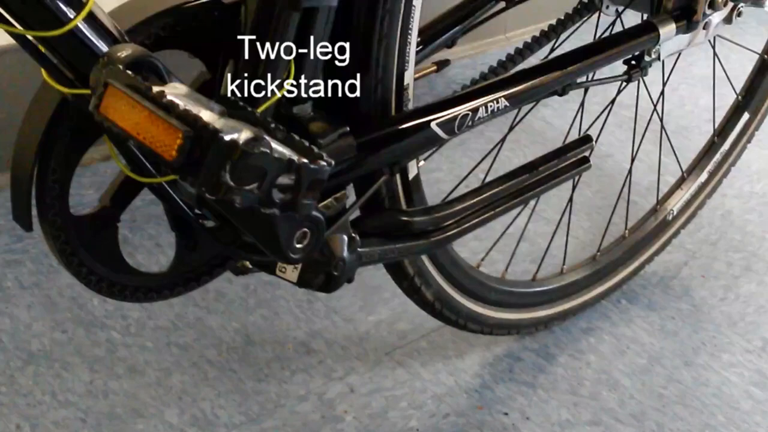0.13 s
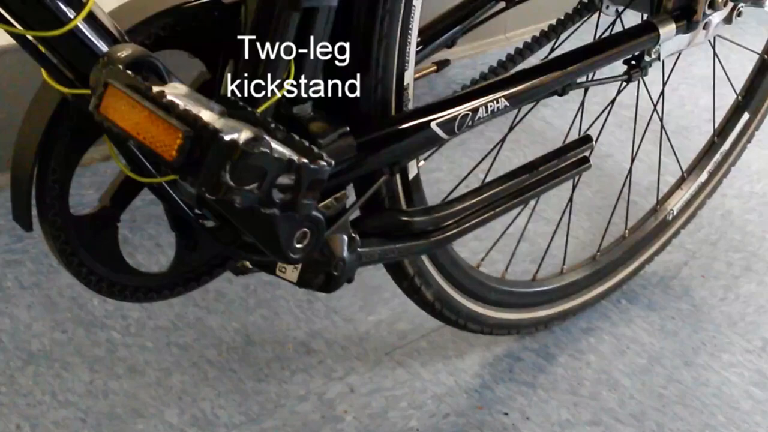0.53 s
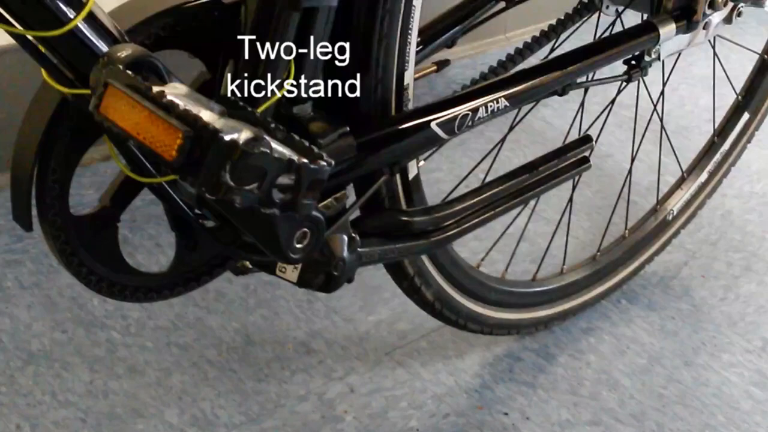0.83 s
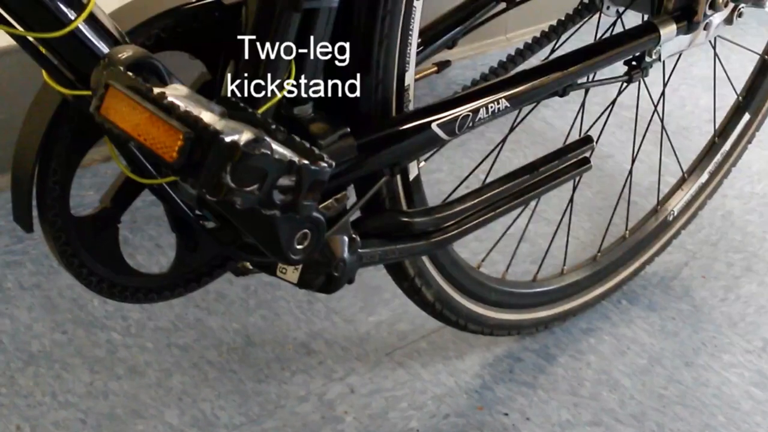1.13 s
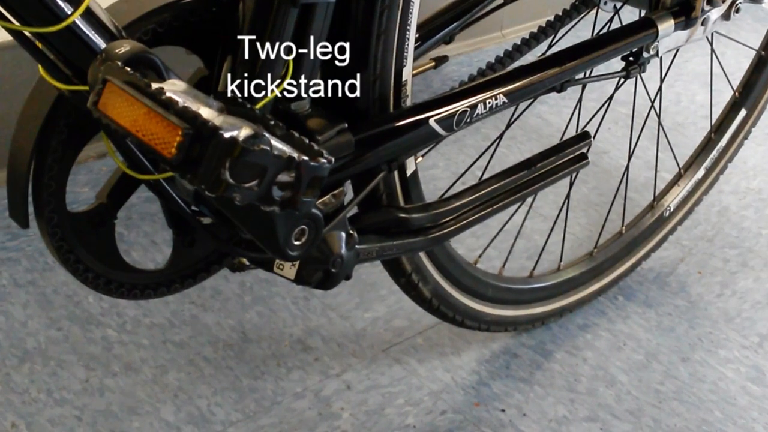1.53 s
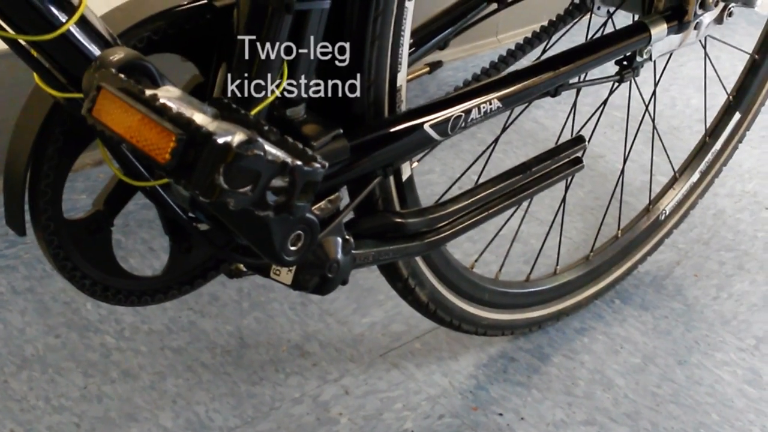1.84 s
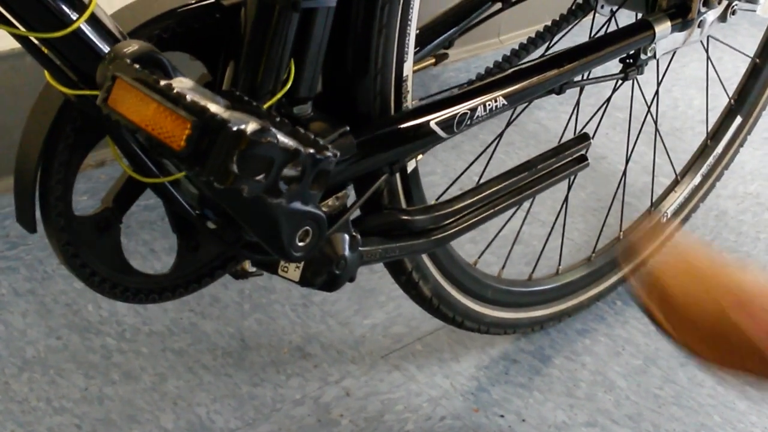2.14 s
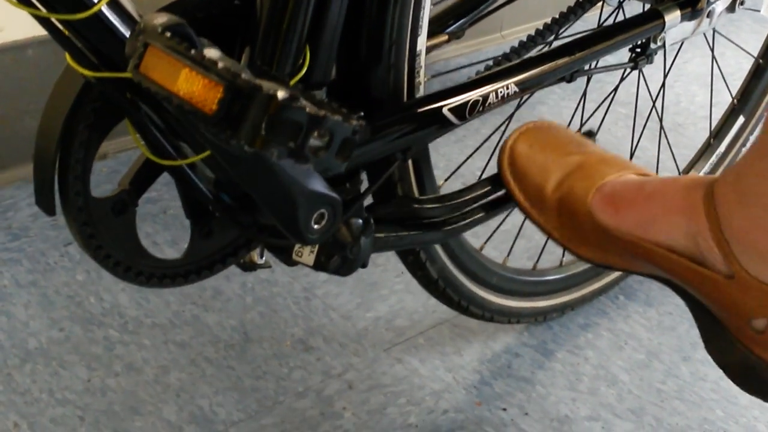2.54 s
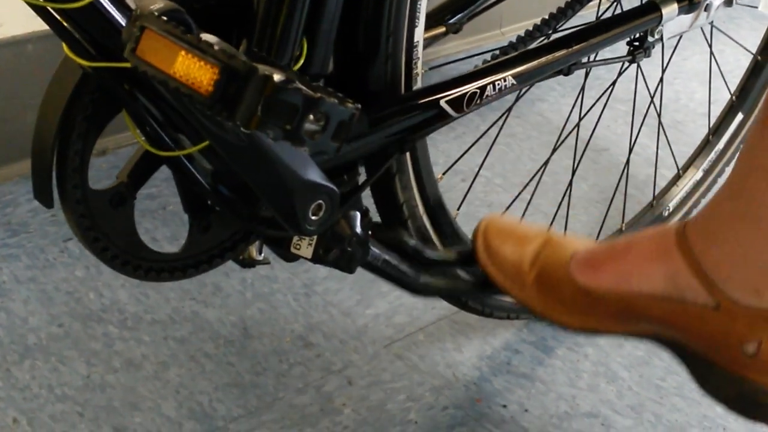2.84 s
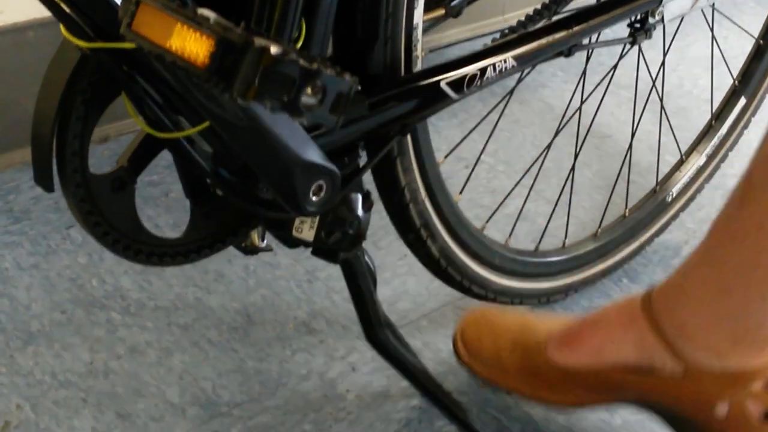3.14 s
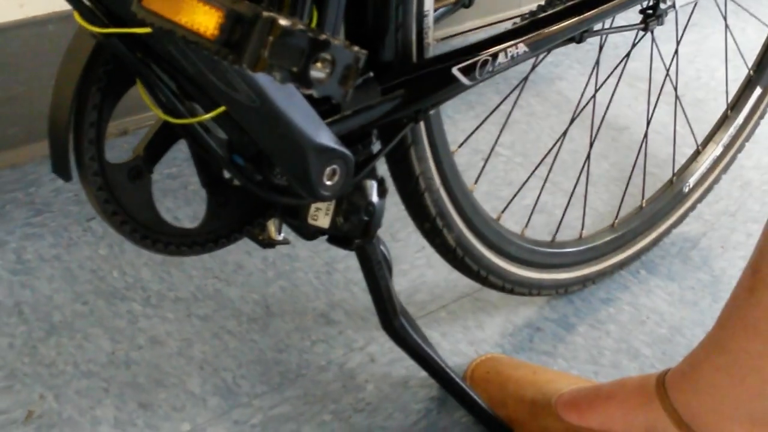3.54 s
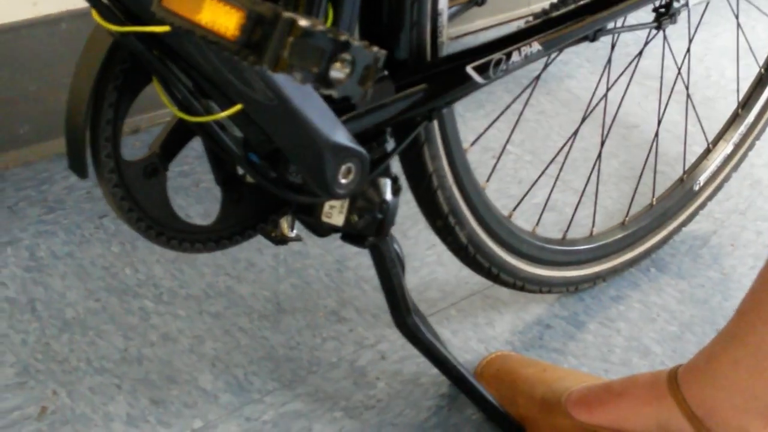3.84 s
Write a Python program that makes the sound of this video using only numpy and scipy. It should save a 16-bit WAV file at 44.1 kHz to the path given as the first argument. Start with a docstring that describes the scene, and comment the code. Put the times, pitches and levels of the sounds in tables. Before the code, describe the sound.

A metal bicycle kickstand is pushed down indoors. Until 3 s there is only low ventilation rumble, wavering hum, soft hiss, faint rustling and tiny ticks, then slight shoe scuffs. At 3.09 s a weak tick leads into two loud, bright steel slaps at 3.11 and 3.13 s, with a half-second room tail. A faint tick at 3.4 s and soft scuff near 3.6 s follow, background lowered.

```python
"""Bicycle stand clacking down on a hard floor

Indoors, a shoe pushes a steel two-leg stand down: one leg ticks, then both slap the floor and the room rings.
The steel is a set of dying sine waves with a noise chatter and a low thud; the room is a dying noise tail.
Shaped noise makes the ventilation rumble, hum, hiss and rustle behind; the opening stretch plays twice.
A phone's gain control drops at the clack and stays low.
"""
import sys
import numpy as np
from scipy import signal
from scipy.fft import rfft, irfft, next_fast_len
from scipy.io import wavfile
from scipy.ndimage import uniform_filter1d, map_coordinates

SR = 44100
rng = np.random.default_rng(int(sys.argv[2]) if len(sys.argv) > 2 else 0)


def wrap_up_sound(samples):
    """Save the sound to the file named by the first command line argument, as 16-bit audio."""
    columns = np.atleast_2d(samples).T
    # keep every value between -1 and 1, then stretch to whole-number steps
    tamed = np.clip(columns, -1, 1)
    steps = np.round(tamed * 32767).astype(np.int16)
    wavfile.write(sys.argv[1], SR, steps)


def decibels_to_gain(level_db):
    """Convert a level in decibels to a linear amplitude gain (20 dB per decade)."""
    exponent = np.asarray(level_db, float) / 20
    return 10 ** exponent


N = 176400  # samples, 4 s

START_S, REPEAT_S = 0.0578, 55915 / 44100  # silence before the sound; length of the stretch heard twice


def unit(x):
    """Scale a sound to an rms of 1."""
    return x / np.sqrt(np.mean(x ** 2) + 1e-20)


def along(points, hz):
    """Read a curve of (Hz, value) points, with straight lines on a log frequency axis."""
    f, v = np.transpose(points)
    return np.interp(np.log(hz + 1), np.log(f + 1), v)


def wobble(rate):
    """A smooth random curve with `rate` random knots a second."""
    return map_coordinates(rng.standard_normal(400), [np.arange(N) * rate / SR])


def filtered(x, response):
    """Make each frequency of x stronger or weaker, as response(hz) says."""
    n = x.shape[-1]
    m = next_fast_len(n + 8192)
    return irfft(rfft(x, m) * response(np.fft.rfftfreq(m, 1 / SR)), m)[..., :n]


def rush(gain, patchy_db):
    """Stereo noise of rms 1, coloured by gain(hz), with louder and softer patches in time and pitch."""
    # how alike left and right are: pitch_hz, likeness (1 = same, 0 = unrelated)
    alike = [(40, 0.52), (110, 0.98), (220, 0.92), (400, .8), (650, 0.72), (1000, 0.021), (2300, -0.071),
             (5700, 0.0036), (14000, 0)]
    z = signal.stft(rng.standard_normal((2, N)), nperseg=512)[2]
    patches = uniform_filter1d(rng.standard_normal(z.shape[1:]), size=6, axis=0)
    patches = unit(uniform_filter1d(patches, size=10, axis=1))
    pair = signal.istft(z * decibels_to_gain(patchy_db * patches), nperseg=512)[1][:, :N]

    def mid_side_gain(hz):
        turn = np.arccos(np.clip(along(alike, hz), -1, 1)) / 2
        return gain(hz) * [np.cos(turn), np.sin(turn)]

    mid, side = filtered(pair, mid_side_gain)
    return unit(np.array([mid + side, mid - side]))


def fade(t, t60):
    """Dying away by 60 dB in t60 seconds."""
    return decibels_to_gain(-60 * t / t60)


def steel_ring(t, tilt_db, length):
    """Legs and frame ring at their own pitches, each dying at its own speed."""
    # ringing pitches of legs and frame: pitch_hz, level_db, t60_s (stretched by `length`)
    steel = [(612, -22, .06), (1985, -21, .35), (2224, -15.5, 0.17), (2975, -11, .025), (3693, -8.5, 0.037),
             (4700, -7, .03), (5300, -10, 0.04), (6650, -3, 0.07), (7400, -12.5, .03), (8000, -4.5, .04),
             (8400, -21, .03), (9400, -10.5, .03), (11100, -13.5, .04)]
    ring = 0
    for hz, db, t60 in steel:
        level_db = db + tilt_db * np.log2(hz / 5000) + rng.normal(0, 1.3, (2, 1))
        phase = rng.uniform(0, 2 * np.pi, (2, 1))
        ring = ring + decibels_to_gain(level_db) * fade(t, t60 * length) * np.sin(2 * np.pi * hz * t + phase)
    return ring


def foot_chatter(t, tilt_db, length):
    """The foot of the leg chatters on the floor: noise that holds for a moment, then fades."""
    # colour of the chatter: pitch_hz, relative level_db per Hz
    chatter_colour = [(180, -51.5), (300, -26.5), (1090, -24.5), (4200, -18.5), (4780, -2.5), (5720, -18),
                      (6730, -9.5), (8460, -10.5), (9180, -16), (14700, -38)]
    hold_s, fade_s, level_db = 0.0035, 0.02 * length, 0.5
    # one part shared by both sides, one of each side's own
    noise = rng.standard_normal(len(t)) + 1.5 * rng.standard_normal((2, len(t)))
    noise = filtered(noise, lambda hz: decibels_to_gain(along(chatter_colour, hz) + tilt_db * np.log2((hz + 1) / 5000)))
    return unit(noise) * decibels_to_gain(level_db) * fade(np.maximum(t - hold_s, 0), fade_s)


def floor_thud(t):
    """The blow on the floor: one low tone that dies quickly."""
    return decibels_to_gain(-21) * fade(t, 0.04) * np.sin(2 * np.pi * 110 * t)


def stand():
    """Each contact chatters, rings and thuds; also returns the bare slaps sent into the room."""
    # contacts of the stand: start_s, level_db (relative), brightness in dB per octave around 5000 Hz,
    # ring length (times the usual)
    blows = [(3.0935, -22, -5, 0.97), (3.1078, 3.5, 0.5, 1.27), (3.1286, 8.5, .5, 0.55),
             (3.4163, -21.5, 8.5, 0.55)]
    rise_s, slap_db = 0.00034, 24
    out, slaps = np.zeros((2, N + SR)), np.zeros(N)
    t = np.arange(SR // 2) / SR
    for start_s, db, tilt_db, length in blows:
        blow = steel_ring(t, tilt_db, length) + foot_chatter(t, tilt_db, length) + floor_thud(t)
        rise = 1 - np.exp(-t / rise_s)
        i = round(start_s * SR)
        out[:, i:i + len(t)] += decibels_to_gain(db - 7) * rise * blow
        slaps[i] = decibels_to_gain(db + slap_db) * length
    return out[:, :N], slaps


def room(x):
    """A weak near answer, then the far walls build the tail; each frequency dies at its own speed."""
    # how long the room rings: pitch_hz, t60_s
    ring_time = [(200, 0.52), (600, .7), (1300, 0.51), (2000, 0.57), (3500, 0.52), (5000, 0.53), (8000, .5),
                 (11000, 0.43), (13000, 0.19)]
    near_db, far_wall_s, build_s = -3, 0.036, 0.013
    hz, t, z = signal.stft(rng.standard_normal((2, SR)), SR, nperseg=256)
    tail = signal.istft(z * fade(t, along(ring_time, hz)[:, None]), SR, nperseg=256)[1]
    u = np.arange(tail.shape[1]) / SR
    far = 1 / (1 + np.exp(-(u - far_wall_s) / build_s * 4))
    tail = tail * (decibels_to_gain(near_db) + far) * np.clip(u / 0.0053, 0, 1)  # fades in over 5.3 ms
    return signal.fftconvolve(x[None], tail / np.linalg.norm(tail[0]), axes=1)[:, :N]


def room_answer(steel, slaps):
    """The coloured slaps and some of the left side's steel sound go round the room."""
    # what the blow sends round the room: pitch_hz, level_db
    room_colour = [(150, -41.5), (280, -9.5), (450, -14), (650, -5), (1000, -17.5), (1500, -12.5),
                   (2050, 2), (2800, -7), (3600, -8), (4800, -6), (5800, -9.5), (6700, -1.5), (8000, -4),
                   (10000, -10.5), (11500, -17.5), (13000, -40.5)]
    sent = filtered(slaps, lambda hz: decibels_to_gain(along(room_colour, hz))) + decibels_to_gain(-9.5) * steel[0]
    return decibels_to_gain(0.5) * room(sent)


def rustle(t):
    """Clothes and shoes: patchy noise that swells and sinks with the movements."""
    # rustle in the repeated stretch: time_s, level_db
    rustle_level = [(0.06, -39), (0.288, -47), (0.526, -42), (0.624, -50), (0.818, -61), (0.848, -40.5),
                    (0.866, -47), (0.904, -37.5), (0.926, -43.5), (1.024, -50), (1.228, -43), (1.32, -46)]
    # shoe on floor: time_s, half_length_s, level_db
    scuffs = [(2.76, 0.048, -53), (3.005, 0.0059, -47.5), (3.074, 0.011, -68), (3.04, 0.039, -43.5),
              (3.566, 0.033, -36), (3.8, 0.063, -47.5)]
    # colour of the rubbing: pitch_hz, relative level_db per Hz
    cloth = [(880, -14.5), (1500, -10.5), (1980, -8.5), (2280, -6.5), (3130, -13.5), (4130, -9),
             (6050, -6.5), (7540, 0), (8140, -5.5), (10400, -5), (13500, -17), (14700, -26.5)]
    level = decibels_to_gain(np.interp(t, *np.transpose(rustle_level))) * (t < START_S + REPEAT_S)
    for middle_s, half_s, db in scuffs:
        level = level + decibels_to_gain(db) * np.exp(-((t - middle_s) / half_s) ** 2)
    return level * decibels_to_gain(0.41 * wobble(40)) * rush(lambda hz: decibels_to_gain(along(cloth, hz)), patchy_db=2)


def faint_ticks(t):
    """Small ticks: sine waves that start at once and die by 60 dB in 14 ms."""
    # faint ticks: start_s, level_db, pitch_hz
    tick_list = [(0.84, -37, 5100), (2.908, -39, 5200), (2.625, -47.5, 10500)]
    ticks = 0
    for start_s, db, hz in tick_list:
        since = t - start_s
        ticks = ticks + decibels_to_gain(db) * fade(np.abs(since), 0.014) * (since > 0) * np.sin(2 * np.pi * hz * since)
    return ticks


def fan_hum(t):
    """Wavering fan tones: narrow bands of noise that swell and sink together."""
    # fan tones: pitch_hz, width_hz (to half strength on either side), level_db before the swell
    fan_tones = [(81, 6.7, -57.5), (150.3, 8, -55), (190, 10, -58), (342, 10, -61)]
    # swell of the hum: time_s, change_db
    hum_swell = [(.06, 5.5), (.5, -9), (.8, -1.5), (1.1, 7), (1.32, 3), (2.6, -6.5), (4, -4.5)]
    swell_db = np.interp(t, *np.transpose(hum_swell))
    hum = 0
    for hz, width, db in fan_tones:
        band = rush(lambda f: 1 / (1 + ((f - hz) / width) ** 2), patchy_db=1)
        hum = hum + decibels_to_gain(db + swell_db + 0.5 * wobble(2.8)) * band
    return hum


def air():
    """Ventilation rumble and hiss: steady coloured noise, slightly unsteady in level."""
    # colour of rumble and hiss: pitch_hz, relative level_db per Hz
    air_colour = [(12, -31), (20, -1.5), (22, -12), (32, -31), (86, 0.5), (154, -2.5), (291, 0),
                  (406, -6.5), (535, -6.5), (725, -5.5), (810, -7.5), (1660, -12.5), (1850, -16.5),
                  (2190, -15.5), (3220, -23.5), (7380, -15.5), (13500, -26.5), (14700, -36)]
    return decibels_to_gain(-44 + 0.37 * wobble(2.7)) * rush(lambda hz: decibels_to_gain(along(air_colour, hz)), patchy_db=1.46)


def room_tone():
    """Rustle, ticks, hum and air; the opening stretch is heard twice in a row."""
    t = np.arange(N) / SR
    tone = rustle(t) + faint_ticks(t) + fan_hum(t) + air()
    first, length = round(START_S * SR), round(REPEAT_S * SR)
    tone[:, first + length:first + 2 * length] = tone[:, first:first + length]
    return tone * (t > START_S)


def scene():
    """The stand, its room and the room tone."""
    steel, slaps = stand()
    return steel + room_answer(steel, slaps) + room_tone()


def microphones(x):
    """The microphone ports add a resonance, and the two sides differ in tone."""
    # the two microphones: pitch_hz, left minus right in dB
    lean = [(30, 1.5), (110, 0.5), (300, .5), (680, 1), (1250, -1), (2300, 1.5), (4230, 2), (7770, -6),
            (12000, -2.5)]
    port_hz, width_hz, port_db = 7400, 1100, -12.5

    def port(f):
        return decibels_to_gain(port_db) * 1j * f * width_hz / (port_hz ** 2 - f * f + 1j * f * width_hz)

    x = x + filtered(x, port)
    return filtered(x, lambda hz: decibels_to_gain(np.outer([0.5, -0.5], along(lean, hz))))


def gain_control(x):
    """Turns down by the loudest level so far and never back up; part of the cut sets in slowly."""
    from_db, share, attack_s = -15, 0.55, 0.006
    creep_share, creep_s = 0.37, 0.17
    power = uniform_filter1d((x ** 2).mean(0), size=88, origin=43)  # mean of the last 2 ms
    level_db = 10 * np.log10(np.abs(power) + 1e-12)
    cut_db = share * np.maximum(np.maximum.accumulate(level_db) - from_db, 0)

    def lag(s):
        return signal.lfilter([1 / (s * SR)], [1, 1 / (s * SR) - 1], cut_db)

    return x * decibels_to_gain(-lag(attack_s) - creep_share * lag(creep_s))


def soft_clip(x):
    """Peaks bend over smoothly and never pass 1."""
    return x / (1 + np.abs(x) ** 6) ** (1 / 6)


def low_pass(x):
    """Removes everything above the highest recorded frequency."""
    return signal.sosfilt(signal.butter(12, 14870, fs=SR, output="sos"), x)


def record(dry):
    """The phone: microphones, gain control, then clipping of the peaks."""
    mix = soft_clip(gain_control(microphones(dry)))
    return low_pass(mix)


dry = scene()
out = record(dry)
wrap_up_sound(out)
```